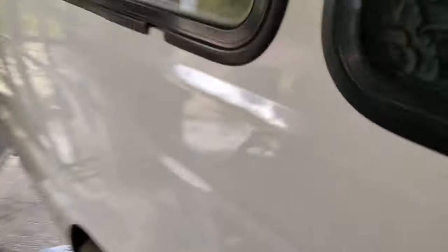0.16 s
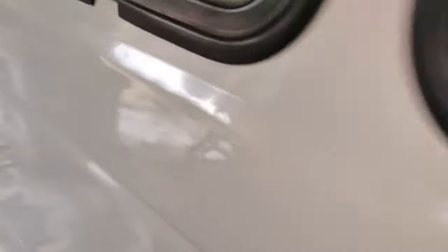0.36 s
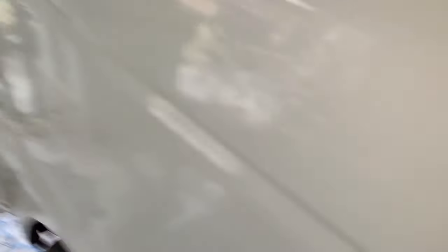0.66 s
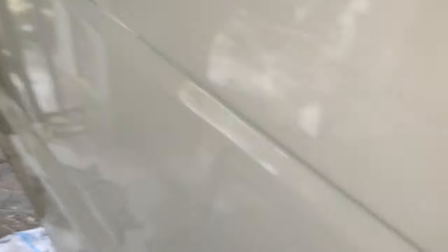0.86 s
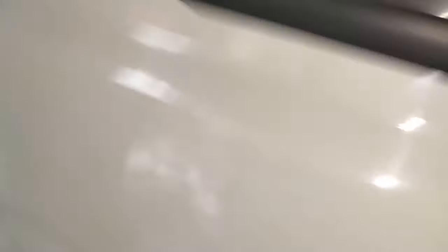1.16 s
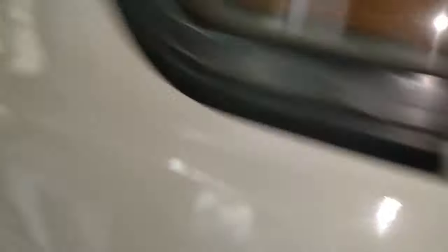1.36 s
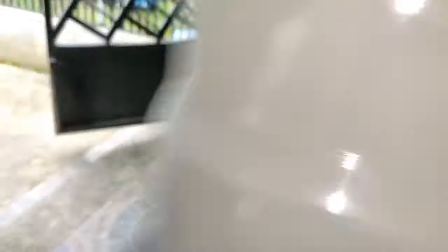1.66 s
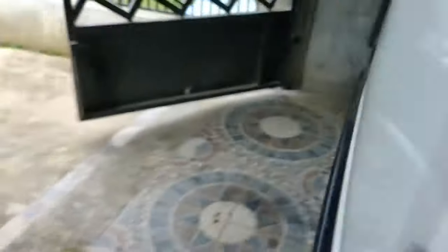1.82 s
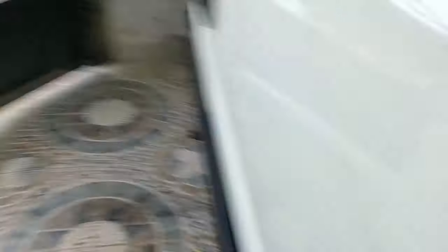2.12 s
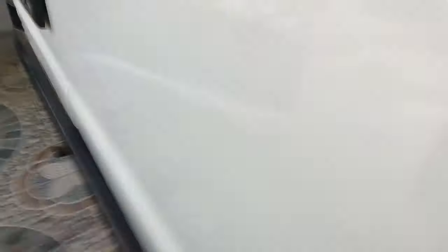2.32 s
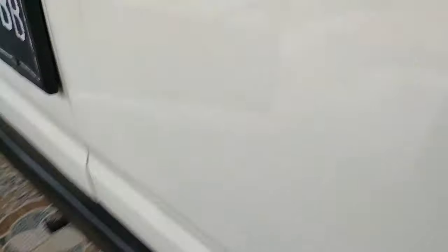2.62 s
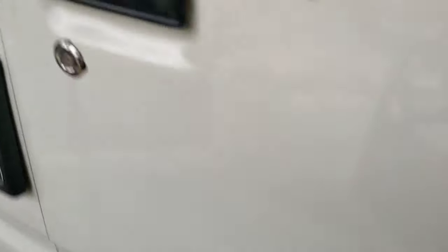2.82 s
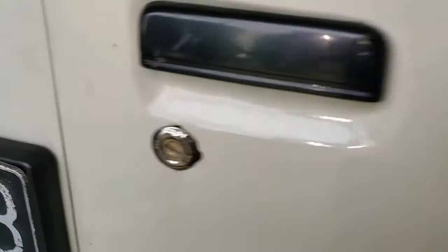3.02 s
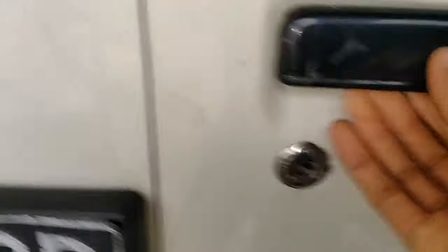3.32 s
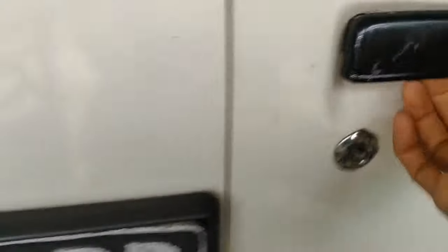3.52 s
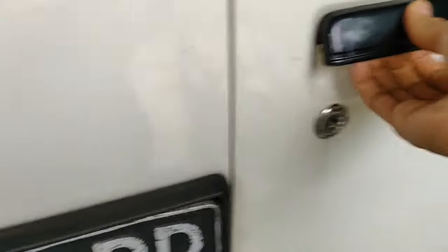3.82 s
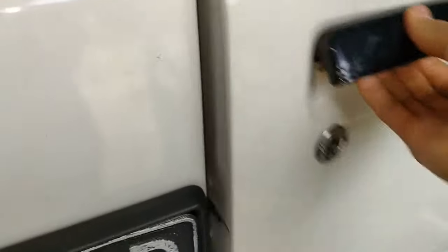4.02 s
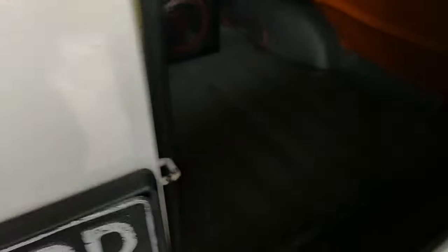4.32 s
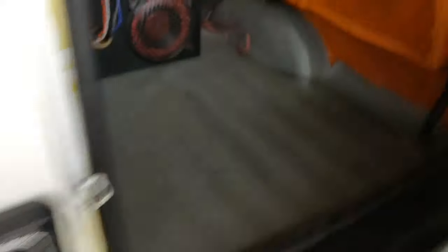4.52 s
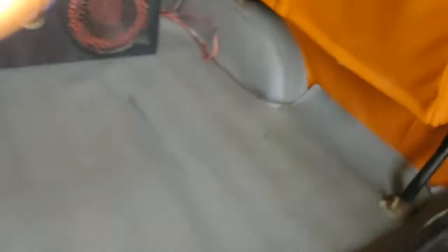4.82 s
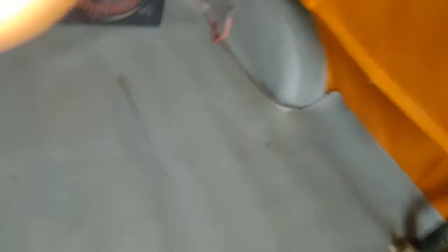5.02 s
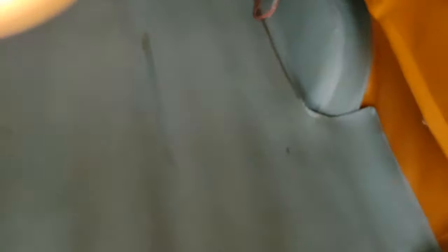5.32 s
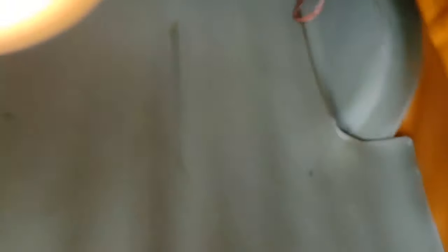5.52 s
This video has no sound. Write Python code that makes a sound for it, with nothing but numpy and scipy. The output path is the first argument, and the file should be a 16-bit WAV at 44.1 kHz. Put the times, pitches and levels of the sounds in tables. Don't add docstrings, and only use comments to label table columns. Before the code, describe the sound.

Heavy metal van door slam, quiet handling and birdsong, a few handle knocks, a sharp overloaded latch snap, then hinge clicks and faint squeaks.

```python
import sys
import numpy as np
from scipy import signal
from scipy.io import wavfile
from scipy.ndimage import uniform_filter1d

SR = 44100
rng = np.random.default_rng(int(sys.argv[2]) if len(sys.argv) > 2 else 0)


def int16_out(signal):
    q = np.round(np.clip(np.atleast_2d(signal).T, -1, 1) * 32767)
    wavfile.write(sys.argv[1], SR, q.astype(np.int16))


def decibels_to_gain(level_db):
    exponent = np.asarray(level_db, float) / 20
    return 10 ** exponent


N = 249958

# (frequency [Hz], likeness [0-1])
SAME = [(60, 0.76), (160, 0.95), (430, 0.64), (1140, 0), (3030, 0.06), (8090, 0)]
# (time [s], level [dB], wheel hum [Hz])
ROLLER = [
    (0, -50, 316),
    (.12, -53, 281),
    (.3, -54.5, 325),
    (.4, -64, 320),
]
# (time [s], peak [dB], sharp share [dB])
BLOWS = [(0.503, -18, -17.5), (0.513, -10, -5.5), (0.522, -10, -6), (0.534, -8.5, -9), (0.554, 4, -37),
         (0.562, 3.5, -17.5), (0.57, 4.5, -23.5), (0.583, -12.5, -17), (0.593, -1.5, -26),
         (0.614, -2.5, -17), (0.93, -23, -17), (0.951, -31, -11)]
# (frequency [Hz], level [dB])
PANEL = [(470, -2), (530, 0.5), (600, 0), (660, 2), (730, 1.5), (810, -2), (900, -5), (1010, -3),
         (1130, -7), (1700, -13.5)]


def evened(x):
    return x / np.sqrt(np.mean(x ** 2) + 1e-20)


def read(points, hz):
    f, value = np.transpose(points)
    return np.interp(np.log(hz + 1), np.log(f + 1), value)


def curve(rows, t, axis=1):
    columns = np.transpose(rows)
    return np.interp(t, columns[0], columns[axis])


def swell(t, s, rise, t60):
    climb = np.clip((t - s) / max(rise, .005) + 1, 0, 1) ** 2
    return climb * decibels_to_gain(-60 * np.maximum(t - s, 0) / max(t60, .05))


def add(mix, s, sound, pan_db=0):
    part = mix[:, round(s * SR):][:, :np.shape(sound)[-1]]
    panned = sound * decibels_to_gain(np.array([[pan_db / 2], [-pan_db / 2]]))
    part += panned[:, :part.shape[1]]


def resonate(x, hz, width):
    turn = np.exp(2j * np.pi * np.cumsum(hz * np.ones(len(x))) / SR)
    r = np.exp(-np.pi * width / SR)
    return 2 * (turn * signal.lfilter([1 - r], [1, -r], x / turn)).real


def ring(modes, seconds, rise, apart_hz=900):
    t = np.arange(round(seconds * SR)) / SR
    phases = rng.uniform(0, 2 * np.pi, len(modes))
    slips = rng.standard_normal(len(modes))
    rung = np.zeros((2, len(t)))
    for (hz, db, t60), phase, slip in zip(modes, phases, slips):
        port_phase = np.array([[0], [slip * hz / apart_hz]])
        rung += decibels_to_gain(db - 60 * t / t60) * np.sin(2 * np.pi * hz * t + phase + port_phase)
    rung *= np.sin(np.pi / 2 * np.minimum(t / rise, 1)) ** 2
    return rung / abs(rung).max()


def tick(t60, dull):
    t = np.arange(4000) / SR
    raw = rng.standard_normal((2, 4000))
    body = signal.lfilter([1, -.8], [1, -np.clip(dull, -.9, .9)], raw)
    holes = np.array([resonate(port, 6800, 870) for port in raw])
    crack = (body + decibels_to_gain(8.0) * holes) * decibels_to_gain(-60 * t / t60) * np.minimum(t / 0.00032, 1)
    return crack / abs(crack).max()


def pings(rows, partner, partner_db):
    out, t = np.zeros((2, N)), np.arange(6000) / SR
    for s, db, hz, t60, pan_db in rows:
        slip = np.array([[0], [np.pi / 2 * min(hz / 1500, 1)]])
        pair = np.sin(2 * np.pi * hz * t + slip)
        pair += decibels_to_gain(partner_db) * np.sin(2 * np.pi * partner * hz * t - slip)
        fade = decibels_to_gain(db - 60 * t / max(t60, .003)) * np.minimum(t * hz * 2, 1)
        add(out, s, fade * pair, pan_db)
    return out


def noise(shape, patchy_db, size=1024):
    frames, hz = N // (size // 4) + 5, np.fft.rfftfreq(size, 1 / SR)
    a, b, c, d, patches = rng.standard_normal((frames, len(hz), 5)).T
    patches = evened(uniform_filter1d(uniform_filter1d(patches, size=8, axis=0), size=10, axis=1))
    same = np.clip(read(SAME, hz), -1, 1)[:, None]
    left = a + 1j * b
    right = same * left + np.sqrt(1 - same ** 2) * (c + 1j * d)
    colour_db = read([(0.94, -99)] + shape + [(SR / 2, -99)], hz)[:, None]
    z = np.array([left, right]) * decibels_to_gain(colour_db + patchy_db * patches)
    return evened(signal.istft(z, nperseg=size, noverlap=size * 3 // 4)[1][:, :N])


def room(x, decays, gap_s):
    taps = np.zeros((2, SR))
    at = np.arange(round(gap_s * SR), SR - 20, 20)
    at = at + rng.integers(0, 20, (2, SR // 20))[:, :len(at)]
    signs = rng.choice([-1., 1.], (2, SR // 20))[:, :at.shape[1]]
    np.put_along_axis(taps, at, signs, 1)
    hz, t, z = signal.stft(taps, SR, nperseg=512)
    same = np.clip(read(SAME, hz), -1, 1)[:, None]
    z[1] = same * z[0] + np.sqrt(1 - same ** 2) * z[1]
    tail = signal.istft(z * decibels_to_gain(-60 * t / read(decays, hz)[:, None]), SR, nperseg=512)[1]
    return signal.fftconvolve(x.mean(0)[None], tail / np.linalg.norm(tail[0]), axes=1)[:, :N]


def street():
    # (time [s], level [dB])
    traffic = [(0, -60.5), (.4, -51), (1.1, -51), (1.6, -54), (2.0, -53), (2.35, -49), (2.68, -47.5),
               (2.9, -48), (3.5, -46), (4.05, -48.5), (4.45, -45), (4.69, -37.5), (4.84, -48), (5.13, -45),
               (5.25, -50), (5.67, -49)]
    # (frequency [Hz], density [dB per Hz])
    rumble_colour = [(15, -56.5), (25, -14), (48, -27), (123, -3.5), (207, -7.5), (263, -12), (395, -16.5),
                     (763, -43), (900, -27), (1170, -55.5), (1980, -120)]
    hollow_colour = [(250, -19.5), (450, 1.5), (650, 5.5), (900, -2.5), (1300, -16.5), (2200, -33)]
    hiss_colour = [(700, -19.5), (1300, -7.5), (2000, -5.5), (3000, -12.5), (4500, -16), (6000, -8),
                   (8000, -1)]
    # (frequency [Hz], width [Hz], level over rumble [dB])
    drone = (140, 2.8, -10.5)
    # (peak [dB], t60 [s], lingering part [dB])
    shudder = [
        (-18.5, 0.5, -42.5),
        (-38, 0.29, -44.5),
        (-70, 1, -46),
    ]
    # (time [s], peak [dB], t60 [s], left minus right [dB])
    grip = [
        (0.0, -55, 0.8, 6.5),
        (1.95, -70.5, 2.2, 12),
        (2.8, -75.5, 1.8, -14.5),
        (3.1, -61, 0.18, -1),
        (3.65, -65.5, 1.18, -6),
        (4.15, -49.5, 0.75, -2.5),
        (4.95, -67.5, 2.5, -2),
        (5.12, -55.5, 0.47, 1.5),
        (5.418, -81, 0.84, 9.5),
    ]
    t, sides = np.arange(N) / SR, np.array([[.5], [-.5]])
    street_db = curve(traffic, t)
    shudder_s, rise_s, linger_t60_s = .63, .11, 2.06
    stirs = []
    for db, t60, linger_db in shudder:
        stir = decibels_to_gain(db) * swell(t, shudder_s, rise_s, t60)
        linger = decibels_to_gain(linger_db) * swell(t, shudder_s, rise_s, linger_t60_s)
        stirs.append(stir + linger * np.clip((1.1 - t) * 10, 0, 1))
    low_stir, mid_stir, high_stir = stirs
    echo_db = np.minimum(-65.5 + 2.5 * (street_db + 48), -58.5)
    rolling = decibels_to_gain(curve(ROLLER, t) - 5) * (t < BLOWS[0][0])
    cabin = decibels_to_gain(-61.5) * np.clip((t - 4.43) * 2, 0, 1)
    rustle = sum(decibels_to_gain(db + sides * pan_db) * swell(t, s, .14, t60) for s, db, t60, pan_db in grip)
    low = (decibels_to_gain(street_db) + low_stir) * noise(rumble_colour, patchy_db=3.5, size=2048)
    mid = (decibels_to_gain(echo_db) + cabin + rolling + mid_stir) * noise(hollow_colour, patchy_db=3.5)
    drone_hz, width, drone_db = drone
    low += decibels_to_gain(street_db + drone_db) * evened(resonate(rng.standard_normal(N), drone_hz, width))
    hiss = decibels_to_gain(sides * 5) * (decibels_to_gain(-73.5) + high_stir) + rustle
    return low + mid + hiss * noise(hiss_colour, patchy_db=3.0, size=512)


def far_engine():
    # (start [Hz], end [Hz], level [dB]))
    passing = (3.05, .42, [(129, 132, -49), (165, 187, -51)])
    t, (s, half, tones) = np.arange(N) / SR, passing
    way = np.clip((t - s) / half, -1, 1)
    exhaust = np.zeros(N)
    for from_hz, to_hz, db in tones:
        hz = from_hz + (to_hz - from_hz) * (way + 1) / 2
        exhaust += decibels_to_gain(db) * evened(resonate(rng.standard_normal(N), hz, 0.88))
    return np.cos(np.pi / 2 * way) ** .5 * exhaust


def birds():
    # (time [s], peak [dB])
    chirps = [(0.085, -64), (0.2049, -58), (0.3301, -59), (0.4566, -57), (1.033, -55.5), (1.1, -55),
              (1.2042, -57.5), (1.3515, -52), (1.426, -54.5), (1.5138, -54), (1.585, -56), (1.7037, -56.5),
              (1.8127, -63), (1.937, -56), (2.008, -67.5), (2.152, -61.5), (2.347, -59), (2.541, -60),
              (2.9976, -72), (3.3655, -59), (3.421, -55.5), (3.531, -57), (3.6184, -57), (3.7243, -58),
              (3.819, -63), (3.8721, -64), (3.998, -63)]
    # (frequency [Hz], t60 [s])
    yard = [(5000, 0.34), (8000, .4)]
    out, t = np.zeros((2, N)), np.arange(round(.012 * SR)) / SR
    variety = rng.normal([1, 0], [.015, 2], (len(chirps), 2))
    for (s, db), (shift, echo_db) in zip(chirps, variety):
        hz = shift * (7800 - 1400 * (t / t[-1]) ** .8)
        whistle = np.sin(2 * np.pi * np.cumsum(hz) / SR)
        chirp = decibels_to_gain(db - 1.5) * np.hanning(len(t)) ** 0.23 * whistle
        add(out, s - .004, chirp, 6)
        add(out, s + .018, decibels_to_gain(echo_db) * chirp, 6)
    return decibels_to_gain(-4) * out + decibels_to_gain(np.array([[10], [5]])) * room(out, yard, .005)


def puffs():
    # (time [s], peak [dB], frequency [Hz], length [s], left minus right [dB])
    gusts = [
        (0.424, -38.5, 114, 0.05, 0.5),
        (4.576, -43.5, 123, 0.038, 25),
        (4.679, -33.5, 102, 0.024, 20),
        (4.699, -34.5, 117, 0.026, 25),
        (4.715, -32.5, 183, 0.019, 25.5),
        (4.787, -34.5, 147, 0.019, 31),
        (4.827, -35.5, 92.6, 0.039, -11),
    ]
    out = np.zeros((2, N))
    for s, db, hz, length, pan_db in gusts:
        t = np.arange(round(max(length, .01) * SR)) / SR
        add(out, s, decibels_to_gain(db) * np.hanning(len(t)) * np.sin(2 * np.pi * hz * t), pan_db)
    return out


def scuffs():
    # (time [s], length [s], level [dB], left minus right [dB])
    rubs = [(0.918, 0.072, -47, 1), (1.252, 0.17, -62.5, 4.5), (1.786, 0.22, -57, 7), (2.003, 0.39, -58, 5),
            (2.648, 0.061, -57, -24.5), (2.704, 0.092, -51.5, -16.5), (2.831, 0.085, -63.5, -17),
            (2.907, 0.038, -60.5, -20), (2.995, 0.034, -55.5, -4), (4.614, 0.039, -59, 3),
            (4.998, 0.048, -58.5, 0.5), (5.044, 0.055, -40, -2)]
    # (frequency [Hz], density [dB per Hz])
    cloth_colour = [(500, -38), (900, 13), (1400, 0.5), (2200, 0.5), (3500, -3), (5500, -6.5), (7500, 9),
                    (8200, -2)]
    out, cloth = np.zeros((2, N)), noise(cloth_colour, patchy_db=0.0, size=256)
    for s, length, db, pan_db in rubs:
        rub = cloth[:, round(s * SR):][:, :round(length * SR)]
        n = rub.shape[1]
        fade = decibels_to_gain(db - 11.6 * np.linspace(0, 1, n)) * signal.windows.tukey(n, .15)
        add(out, s, fade * rub, pan_db)
    return out


def case_taps():
    # (time [s], peak [dB], case note [Hz], tick [dB], left minus right [dB])
    fingers = [(1.102, -56, 445, -48, 6), (1.887, -62, 369, -42.5, 7), (2.648, -34, 410, -33.5, -29.5),
               (2.718, -34.5, 465, -36.5, -24.5), (2.759, -46, 586, -42, -21), (2.791, -38, 448, -67, -13),
               (2.92, -37.5, 420, -67, -20.5), (2.934, -37, 404, -70, -15), (3.038, -40.5, 355, -22, -18),
               (3.058, -27, 363, -33, -5.5), (3.065, -12, 592, -31, -10.5), (3.076, -18, 474, -59, -13),
               (3.086, -24, 574, -46, -18), (5.247, -41.5, 494, -27.5, -21)]
    # (multiple of the case note, level [dB], t60 [s])
    case_modes = [(0.999, 3.5, 0.015), (1.7, -4.5, 0.011), (3.6, -12.5, 0.0042)]
    out, t = np.zeros((2, N)), np.arange(2000) / SR
    for s, db, hz, tick_db, pan_db in fingers:
        knock = sum(decibels_to_gain(d - 60 * t / t60) * np.sin(2 * np.pi * k * hz * t) for k, d, t60 in case_modes)
        knock = knock * np.minimum(t / 0.00082, 1) * [[1], [-1]]
        add(out, s + 0.00133, decibels_to_gain(db + 2.5) * knock, pan_db)
        add(out, s, decibels_to_gain(tick_db + 8) * tick(0.006, dull=0.045))
    return out


def glints():
    # (time [s], peak [dB], frequency [Hz], t60 [s], left minus right [dB])
    small_ticks = [(0.5125, -26, 4600, .03, 4), (0.5185, -24, 6800, .03, 4), (0.928, -52, 1560, .3, 0),
                   (2.649, -42, 900, .012, -20), (2.719, -44, 900, .012, -20),
                   (3.0385, -38, 1400, .008, -10), (3.066, -30, 1500, .008, -8),
                   (1.101, -48, 4400, .012, 6), (4.0, -60, 3200, .03, 0), (3.3058, -50, 6000, .006, 5),
                   (3.3437, -51, 6300, .006, 7), (3.386, -58, 2480, .008, 0),
                   (3.4026, -45, 3240, 0.013, -2), (3.4679, -32.5, 1700, 0.013, 1),
                   (3.472, -36, 3300, .015, -1), (3.6794, -39, 6900, .006, 0),
                   (3.6805, -48, 2800, 0.0092, 0), (3.726, -54, 2800, .025, 0), (3.745, -54, 2800, .025, 0),
                   (3.7832, -35, 6330, 0.012, 5), (3.785, -41, 1850, .02, 3),
                   (4.0588, -15.5, 5000, .015, -4), (4.0605, -17, 4200, .015, -4),
                   (4.2437, -49, 1820, .02, 0), (4.3076, -38.5, 6180, 0.011, 0),
                   (4.4049, -39, 5860, .01, 1.5), (4.4052, -40, 7400, .012, 1),
                   (4.5525, -44.5, 2870, .012, 5), (4.5528, -47.5, 5190, .008, 4.5),
                   (4.6368, -46, 5290, .01, 7), (5.1505, -46.5, 1854, .015, -0.5),
                   (5.151, -46, 3400, .012, 0)]
    return pings(small_ticks, partner=1.12, partner_db=-4)


def thuds():
    # (time [s], peak [dB], frequency [Hz], t60 [s], left minus right [dB])
    dull_hits = [(0.5562, -2, 300, 0.024, 4), (0.5555, -13.5, 890, 0.032, 3),
                 (0.5705, -6.5, 421, 0.028, -2.5), (0.664, -16, 129, 0.056, 0),
                 (3.4685, -28, 297, 0.049, 1), (3.652, -36, 300, .12, 1), (3.7545, -27.5, 560, .04, 1),
                 (3.7845, -32.5, 804, 0.035, -0.5), (4.138, -25, 686, 0.078, 1), (4.14, -27, 387, .05, 0),
                 (4.203, -29.5, 114, .1, 0), (5.047, -22, 213.6, .05, 1), (5.0555, -27, 641, 0.038, 5),
                 (5.088, -26, 228, 0.041, 3), (5.104, -30, 200, .1, -1), (5.1505, -36, 703, .025, 0),
                 (5.121, -34, 215, .05, 0), (4.0665, -16, 165, .12, -2)]
    return pings(dull_hits, partner=1.31, partner_db=-12)


def hinges():
    # (time [s], peak [dB], frequency [Hz], skin [dB], left minus right [dB])
    clicks = [
        (4.553, -37, 1766, -39, 6.5),
        (4.6194, -48.5, 1760, -57, 4),
        (4.6369, -46, 1740, -48, 10),
        (4.8982, -57.5, 2080, -55.5, -5),
        (4.982, -50, 2340, -59, -6),
        (5.1507, -45, 1890, -39, -0.5),
        (5.6295, -49, 2030, -60.5, -6),
    ]
    # (time [s], level [dB], pitch as a share of rest)
    squeak = [
        (5.15, -64, .96),
        (5.17, -62, .98),
        (5.2, -62, 1.03),
        (5.25, -67, 1.0),
        (5.305, -62, 1.05),
        (5.34, -69, .98),
        (5.39, -62, 0.995),
        (5.46, -65, .99),
        (5.56, -78, .98),
    ]
    # (frequency [Hz], width [Hz], level [dB])
    stay_modes = [(1976, 45, -0.5), (2330, 70, -8), (3370, 200, -9)]
    out, t = np.zeros((2, N)), np.arange(N) / SR
    for s, db, hz, skin_db, pan_db in clicks:
        crack = tick(.035, dull=.5)
        click = np.array([resonate(resonate(port, hz, 900), hz, 900) for port in crack])
        add(out, s, decibels_to_gain(db - 1.5) * click / abs(click).max(), pan_db)
        skin = ring([(f, d, .04) for f, d in PANEL], .1, rise=0.0028)
        add(out, s, decibels_to_gain(skin_db + 3.0) * skin, pan_db)
        add(out, s, decibels_to_gain(db - 6) * tick(0.018, dull=.3), pan_db)
    stay, pitch = np.zeros((2, N)), curve(squeak, t, axis=2)
    for side, rub in enumerate(rng.standard_normal((2, N))):
        for hz, width, db in stay_modes:
            stay[side] += decibels_to_gain(db) * evened(resonate(rub, hz * pitch, width))
    dragging = (t > squeak[0][0]) * (t < squeak[-1][0])
    return out + decibels_to_gain(curve(squeak, t)) * evened(stay) * dragging


def linkage():
    # (frequency [Hz], width [Hz], level [dB])
    rods = [(1300, 500, -38), (1700, 250, -34), (2800, 1200, -38), (4300, 1200, -35), (5600, 1500, -36)]
    t, buzz = np.arange(N) / SR, np.zeros((2, N))
    for side, shake in enumerate(rng.standard_normal((2, N))):
        for hz, width, db in rods:
            buzz[side] += decibels_to_gain(db) * evened(resonate(shake, hz, width))
    return buzz * swell(t, 4.062, .005, .26)


def handle():
    # (time [s], skin [dB], boom [dB], tick [dB], ring t60 [s])
    knocks = [(3.305, -37.5, -32.5, -63, 0.094), (3.403, -40.5, -43, -49, 0.061),
              (3.423, -30, -38, -51, 0.1), (3.47, -19, -25.5, -26.5, 0.06), (3.577, -46, -41, -58, 0.16),
              (3.648, -35, -35, -52, 0.18), (3.679, -33.5, -34, -45.5, 0.12),
              (3.755, -28.5, -37.5, -46.5, 0.095), (3.786, -26, -45, -35, 0.068),
              (3.847, -27.5, -45, -57.5, 0.049), (4.141, -35, -30.5, -56, 0.061),
              (4.245, -42, -48, -58, 0.068), (4.309, -35.5, -65.5, -45, 0.07),
              (4.404, -36.5, -48, -39.5, 0.12), (5.048, -26.5, -26, -38, 0.084),
              (5.083, -42.5, -38, -54.5, 0.033)]
    # (frequency [Hz], level [dB])
    boom_modes = [(165, 10.5), (215, -1.5), (255, -13), (300, 14), (350, -1.5)]
    out = np.zeros((2, N))
    for s, db, boom_db, tick_db, t60 in knocks:
        t60 = np.clip(t60, .01, .4)
        pan_db = np.interp(s, (4.5, 5.0), [0, 10])
        spot = rng.normal(0, [.04, 4], (len(PANEL), 2))
        skin = []
        for (hz, d), (a, b) in zip(PANEL, spot):
            skin.append((hz * (1 + a), d + b, t60 * (600 / hz) ** 0.59))
        boom = [(hz, d, 0.67 * t60) for hz, d in boom_modes]
        add(out, s, decibels_to_gain(db) * ring(skin, .3, rise=0.002), pan_db)
        add(out, s, decibels_to_gain(boom_db) * ring(boom, .4, rise=0.0063))
        add(out, s, decibels_to_gain(tick_db + 11.0) * tick(0.0017, dull=0.93), pan_db)
        add(out, s + 0.00087, decibels_to_gain(tick_db + 7.5) * tick(0.91 * t60, dull=1.0), pan_db)
    return out


def sliding_door():
    # (frequency [Hz], level [dB], t60 [s])
    body_modes = [(67, -15, 0.76), (102, -2.5, 0.36), (175, 1.5, 0.53), (209, -12, 0.33),
                  (261.8, -5.5, 0.68), (319, -4, 0.44), (408, -6, 0.42), (497, -15.5, 0.26), (506, -17, 1),
                  (620, -14.5, 0.81), (650, -22.5, 0.74), (790, -15, 0.21), (904, -10.5, 0.55),
                  (1005, -9, 0.23)]
    # (time [s], peak [dB], frequency [Hz], t60 [s])
    shell = [
        (0.5014, -3, 120, 0.055),
        (0.553, -13, 102, 0.23),
        (0.942, -34, 207.7, 0.14),
        (4.063, -25, 175, 0.099),
        (5.046, -32, 214.4, 0.06),
    ]
    # (time [s], level [dB])
    rattle = [
        (0.5, -50),
        (0.516, -26),
        (0.554, -26.5),
        (0.66, -43),
    ]
    # (frequency [Hz], density [dB per Hz])
    trim_colour = [(530, -12.5), (900, -11.5), (1430, -22), (1990, -18), (3500, -26.5), (5460, -24.5),
                   (6940, -19), (7900, -24), (8200, -52.5), (10700, -80), (18000, -120)]
    out, t = np.zeros((2, N)), np.arange(N) / SR
    for multiple, db in [(1, 1.0), (2, -10.5)]:
        hum = resonate(rng.standard_normal(N), multiple * curve(ROLLER, t, axis=2), 23)
        out += decibels_to_gain(curve(ROLLER, t) + db) * evened(hum) * (t < ROLLER[-1][0])
    for s, db, sharp_db in BLOWS:
        spread = rng.normal(0, [.008, 3], (len(body_modes), 2))
        modes = []
        for (hz, d, t60), (a, b) in zip(body_modes, spread):
            modes.append((hz * (1 + a), d + b, 0.16 * min(t60, .6)))
        add(out, s, decibels_to_gain(db - 6) * ring(modes, .4, rise=0.0056))
        add(out, s, decibels_to_gain(db + sharp_db) * tick(0.012, dull=0.92), 4.5)
    swing = np.arange(SR // 2) / SR
    for s, db, hz, t60 in shell:
        air = np.sin(2 * np.pi * hz * swing) * np.minimum(swing / 0.013, 1)
        add(out, s, decibels_to_gain(db - 60 * swing / t60) * air)
    grains = decibels_to_gain(2.0 * evened(uniform_filter1d(rng.standard_normal(N), size=60)))
    sounding = (t > rattle[0][0]) * decibels_to_gain(-300 * np.maximum(t - rattle[-1][0], 0))
    scrape = evened(noise(trim_colour, patchy_db=2.5, size=256) * grains)
    add(out, 0, scrape * decibels_to_gain(curve(rattle, t) + 5.5) * sounding, 5)
    return out


def latch():
    # (time [s], peak [dB], frequency [Hz], swell [s], held until [s], damping [s])
    skin_note = (4.0557, 2.0, 780, .011, .015, .003)
    # (time [s], peak [dB], frequency [Hz], tick [dB])
    rod_lift = (4.0502, -13, 560, -24)
    # (time [s], peak [dB], left minus right [dB])
    snaps = [
        (4.0564, -24, 0),
        (4.0585, -14.5, -6),
        (4.0672, -30, 5.5),
    ]
    # (frequency [Hz], level [dB], t60 [s])
    skin_modes = [(103, -13, 0.17), (164, -1.5, 0.14), (223, -6.5, 0.04), (283.7, -17.5, 0.079),
                  (310, -11, 0.15), (392, -10, 0.14), (478, -2.5, 0.087), (586, -13, 0.13), (692, -12, 0.2),
                  (738, -17.5, 0.037), (806.5, -8.5, 0.11), (980, -14.5, 0.093), (2200, -22, 0.029)]
    out, note = np.zeros((2, 2, N))
    s, db, hz, rise, held, damping = skin_note
    t = np.arange(round(.06 * SR)) / SR
    shape = np.minimum(t / rise, 1) * np.exp(-np.maximum(t - held, 0) / damping)
    sinking_hz = np.maximum(hz - 6500 * t, 665)
    turns = 2 * np.pi * np.cumsum(sinking_hz) / SR
    add(note, s, decibels_to_gain(db) * shape * np.sin(turns - np.array([[.5], [0]])), -1.2)
    add(out, s + 0.004994, decibels_to_gain(-7.5) * ring(skin_modes, .4, rise=0.006))
    at, lift_db, lift_hz, tick_db = rod_lift
    rod = ring([(lift_hz, 0, .03), (.5 * lift_hz, -4, .03)], 0.036, rise=0.0012)
    add(out, at, decibels_to_gain(lift_db) * rod)
    add(out, at, decibels_to_gain(tick_db) * tick(0.0087, dull=0.33))
    for at, snap_db, pan_db in snaps:
        add(out, at, decibels_to_gain(snap_db + 9) * tick(0.025, dull=0.49), pan_db)
    return note, out


def scene():
    # (frequency [Hz], t60 [s])
    carport = [(60, 0.63), (160, 0.33), (420, 0.37), (1100, 0.39), (2900, 0.37), (7700, 0.26)]
    door, near, (note, snap) = sliding_door(), handle() + hinges(), latch()
    near = near + thuds()
    sent = decibels_to_gain(-4.0) * door + decibels_to_gain(-8) * near + decibels_to_gain(-6.5) * snap + decibels_to_gain(-23.5) * note
    wet = room(sent, carport, .005)
    slam = .8 * np.tanh((door + wet * decibels_to_gain(np.array([[.8], [-.8]]))) / .8)
    rear_door = near + note + snap + linkage() + glints()
    phone = scuffs() + case_taps() + puffs()
    return slam + rear_door + phone + birds() + street() + far_engine()


def top_cut(x):
    return signal.sosfilt(signal.butter(12, 15400, fs=SR, output="sos"), x)


def record(dry):
    edge = signal.firwin(255, 7754, window=("kaiser", 9), fs=SR)
    narrow = signal.oaconvolve(dry, edge[None], "same")
    bass_cut = signal.butter(2, 42, 'high', fs=SR, output='sos')
    narrow = signal.sosfilt(bass_cut, narrow)
    overload = .96
    clipped = np.clip(narrow, -overload, overload)
    clipped = signal.oaconvolve(clipped, signal.firwin(255, 15400, fs=SR)[None], "same")
    treble = signal.butter(4, 11000, 'high', fs=SR, output='sos')
    hiss = signal.sosfilt(treble, rng.standard_normal(dry.shape))
    return top_cut(clipped + decibels_to_gain(-100) * hiss)


dry = scene()
out = record(dry)
int16_out(out)
```